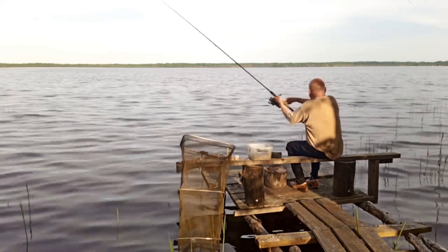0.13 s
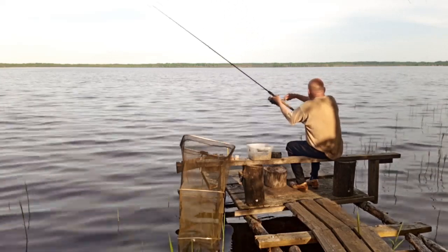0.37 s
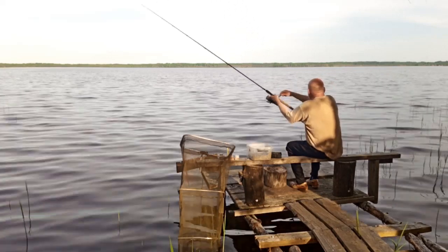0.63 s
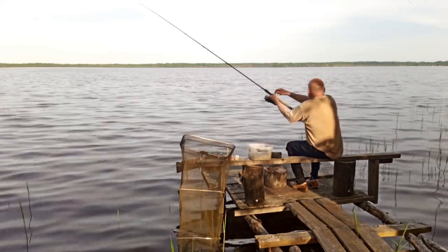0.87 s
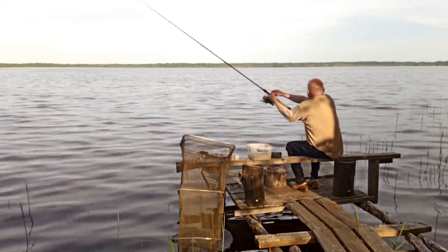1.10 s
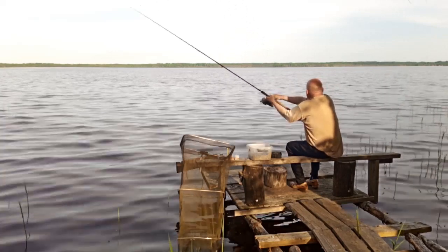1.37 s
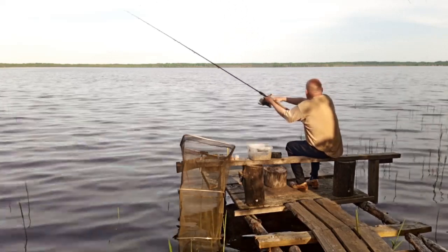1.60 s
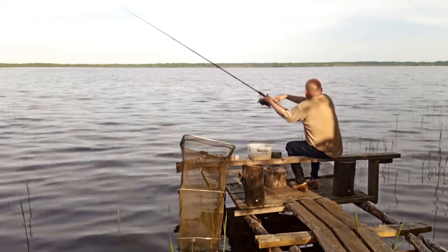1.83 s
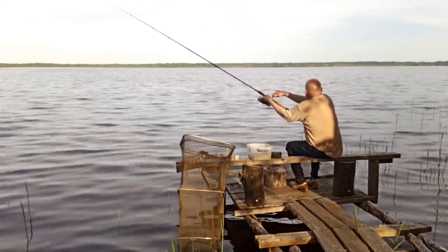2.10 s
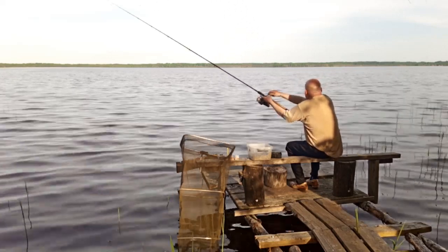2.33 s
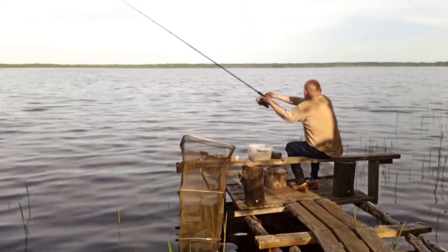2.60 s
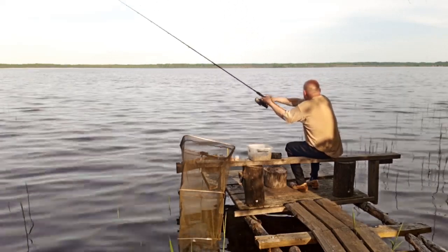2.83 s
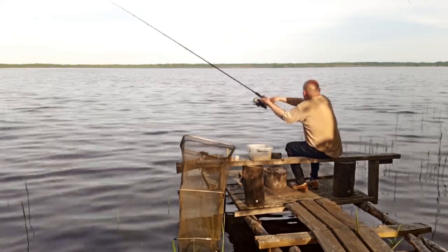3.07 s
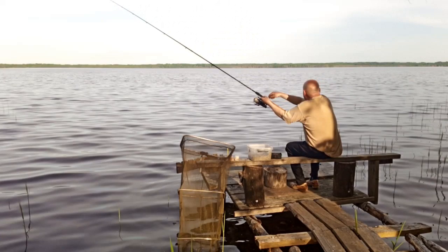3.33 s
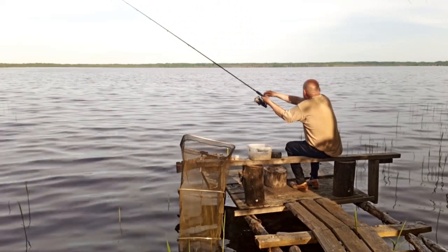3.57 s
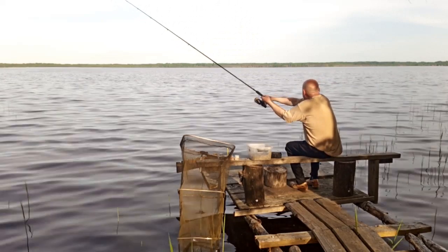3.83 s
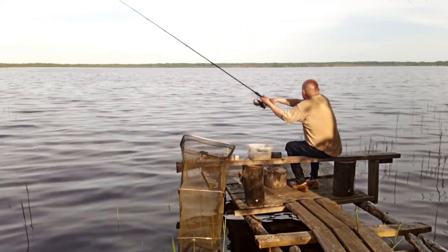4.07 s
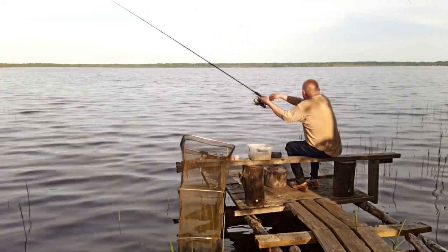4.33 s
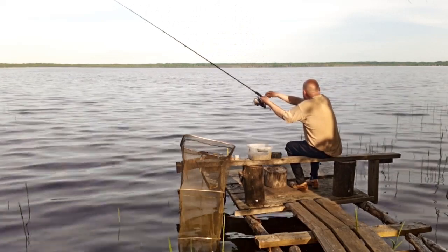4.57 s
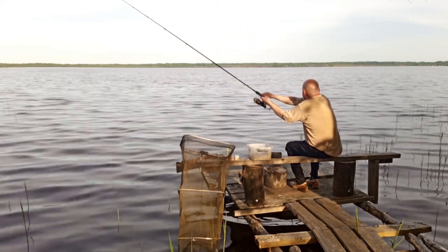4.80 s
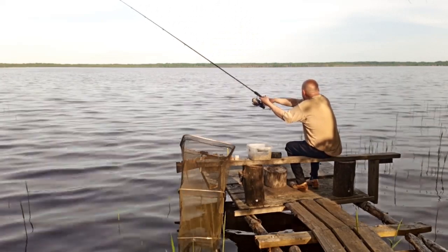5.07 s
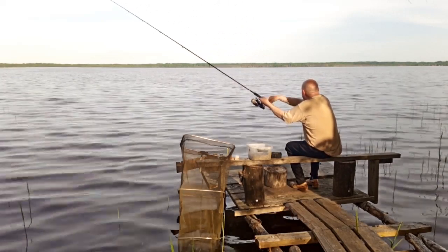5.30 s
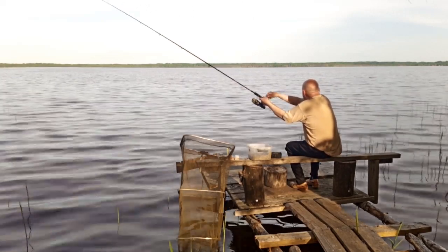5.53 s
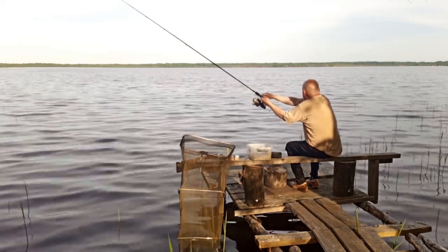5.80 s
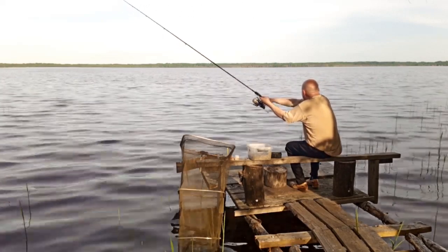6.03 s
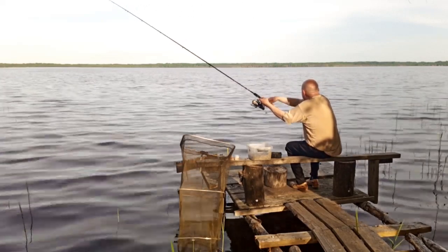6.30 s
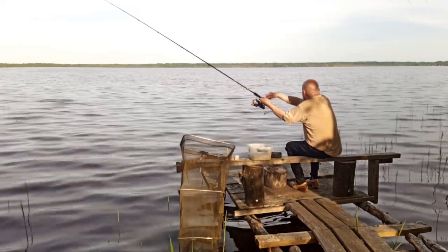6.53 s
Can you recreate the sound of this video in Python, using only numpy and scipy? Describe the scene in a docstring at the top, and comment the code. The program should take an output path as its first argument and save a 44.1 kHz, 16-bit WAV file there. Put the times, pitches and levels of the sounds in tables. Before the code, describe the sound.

Small lake waves slap and gulp against a wooden jetty, busy at first, with bubbling trickles, soft wind rumble and four faint bird notes.

```python
"""A wooden jetty on a lake, close to the water: air pockets gulp and ring as damped, gliding sines.
Small waves slap and smack the wood in bursts of coloured noise, with spray and small bubbles of tiny grains.
A far bird whistles four falling notes. A breeze rumbles at the camera's microphone as swelling low noise,
and the camera's electronics hiss and whine faintly."""
import sys
import numpy as np
from scipy import signal
from scipy.fft import rfft, irfft, next_fast_len
from scipy.io import wavfile
from scipy.ndimage import uniform_filter1d, map_coordinates

SR = 44100
rng = np.random.default_rng(int(sys.argv[2]) if len(sys.argv) > 2 else 0)


def output_pcm(signal):
    """Save a mono or channel-first signal as 16-bit PCM at the path in sys.argv[1].

    Samples are clipped to [-1, 1] before scaling.
    """
    pcm = np.clip(np.atleast_2d(signal).T, -1, 1) * 32767
    wavfile.write(sys.argv[1], SR, np.round(pcm).astype(np.int16))


def ratio_of_db(decibels):
    """Turn decibels (scalar or array-like) into linear amplitude factors; 0 dB maps to 1."""
    return 10 ** (np.asarray(decibels, float) / 20)


N = 293706

# The spectra give shapes only; each layer's loudness is set where it is used.
# far water and electronics: freq_hz, density_db (per Hz)
HISS_SPECTRUM = [(120, -11), (200, 5.5), (316, -1), (379, -4.5), (979, -6.5), (1260, -6.5), (2000, -9),
                 (2770, -7.5), (4710, -21.5), (5060, -36), (5350, -12.5), (6540, -19.5), (9080, -22),
                 (13600, -22.5), (15700, -11)]
# thin electronic tones: pitch_hz, level_db (sine amplitude, before it wavers)
WHINE_TONES = [(3531, -78), (4936, -64), (5606, -80), (5668, -69.5), (6337, -66), (7008, -80), (7068, -71),
               (9872, -84)]
# wind rumble at the microphone: freq_hz, density_db (per Hz)
RUMBLE_SPECTRUM = [(53, -38), (90, 3.5), (129, 8), (269, -7.5), (320, -4), (420, -28), (700, -120)]
# deep wind buffeting at the microphone: freq_hz, density_db (per Hz)
BUFFET_SPECTRUM = [(12, -45), (20, -27), (32, -20), (64, -7), (90, -4), (120, -48), (200, -120)]
# puffs of wind on the microphone: peak_s, rumble_db, buffet_db (added to the calm air), fall_s (to 1/e)
WIND_PUFFS = [(0, -44, -80, 0.018), (.22, -65, -63, 0.066), (.89, -53, -58, 0.024),
              (1.59, -51.5, -74, 0.063), (2.28, -48, -61, 0.032), (3.13, -53.5, -56, 0.041),
              (3.96, -54, -46.5, 0.058), (5.79, -46.5, -67, 0.014)]
# bright falling droplets: freq_hz, density_db (per Hz)
SPRAY_SPECTRUM = [(2200, -1), (3400, -8), (4300, -4), (5400, -0.5), (6500, -0.5), (7600, -16), (9500, -35)]
# restlessness of the water: time_s, unrest_db
UNREST = [(0, 16), (.15, -4.5), (.22, 10.5), (.46, -1.5), (1.09, -1), (1.35, -3.5), (1.59, 2.5), (1.74, -8),
          (1.98, 2.5), (2.35, 0), (2.56, -2), (2.93, 5), (3.11, 2), (4.01, 5.5), (4.32, 0.5), (4.49, -2.5),
          (5.14, -5), (5.57, -2.5), (6.66, -5)]
# the loudest bubbles and gulps, before shaking and filtering:
# peak_s, level_db (peak), pitch_hz (at the peak), t60_s (at least 0.004), glide_per_s (share of the pitch)
AIR_POCKETS = [(0.0125, -5, 563, 0.0052, 10.5), (0.0202, -16, 2310, 0.005, -3.5),
               (.047, -33, 2670, .02, -3), (.0495, -14, 663, 0.049, 1.5), (0.0607, -29, 2280, .006, 8),
               (0.0994, -35, 1690, 0.02, 5.5), (.112, -34, 1513, 0.018, -2), (.133, -37, 1450, 0.025, 1),
               (0.1902, -28.5, 1000, 0.032, -5), (.2003, -25, 820, 0.055, -5.5), (.202, -27, 1640, .01, 10),
               (.216, -39, 2110, .04, -3), (0.246, -30, 2776, 0.0055, -9), (.2487, -28.5, 543, 0.048, 11),
               (0.252, -32, 1420, 0.034, -1), (.266, -33, 1410, 0.023, -2), (.268, -33.5, 601, 0.018, 0),
               (0.2913, -30, 1360, 0.026, -8), (0.308, -31.5, 1400, 0.018, 2),
               (0.326, -32, 1480, 0.015, -9), (.347, -27, 397, 0.35, 10), (.361, -39, 1630, .015, 0),
               (.374, -30, 580, 0.065, 6.5), (.392, -31.5, 604, 0.11, 5.5), (0.391, -32, 1400, 0.029, -1.5),
               (0.482, -34, 2000, 0.032, 20.5), (.64, -44.5, 750, 0.17, -2), (.877, -43, 2330, 0.15, -3.5),
               (1.001, -34, 1443, 0.048, 3), (1.024, -35.5, 1230, 0.02, -2),
               (1.0776, -37.5, 780, 0.025, -0.5), (1.095, -45, 5060, 0.045, 4),
               (1.18, -42.5, 1714, 0.078, 3.5), (1.4206, -36, 696, 0.023, -0.5),
               (1.544, -41, 1550, 0.05, -0.5), (1.57, -27, 624, 0.056, -4), (1.6059, -22, 583, 0.037, 12.5),
               (1.624, -29, 600, 0.016, 3), (1.639, -35.5, 1704, 0.036, -8), (1.667, -42, 519, 0.16, -0.5),
               (1.686, -39, 2190, .03, 1), (1.689, -39.5, 2960, 0.024, 0), (1.775, -46.5, 810, 0.074, 2),
               (2.0068, -31.5, 613, 0.013, -9.5), (2.078, -25.5, 2110, 0.0062, 15.5),
               (2.083, -31, 1630, 0.01, 3), (2.098, -37, 1810, 0.012, -2), (2.0943, -37, 863, 0.018, -1.5),
               (2.266, -34, 499, 0.074, 8), (2.281, -38, 1696, 0.042, -1), (2.37, -44.5, 2860, 0.17, 2.5),
               (2.52, -32.5, 680, 0.016, 4.5), (2.526, -25.5, 1680, 0.022, 4.5),
               (2.5296, -19.5, 2364, 0.0096, 2), (2.5306, -34.5, 658, 0.094, 4.5),
               (2.545, -35, 2350, 0.059, 35), (2.555, -37.5, 2220, .14, 0.5), (2.709, -44, 1120, 0.066, 0),
               (2.7704, -25.5, 369.5, 0.074, 17), (2.77, -30, 1130, 0.042, -6.5),
               (2.857, -38.5, 502.5, 0.28, -1), (2.8729, -26, 523.3, 0.019, -5),
               (2.936, -38.5, 1023, 0.066, 8.5), (2.945, -36, 2040, 0.027, -3.5),
               (3.095, -30, 1830, 0.019, 1.5), (3.1015, -24, 4370, 0.0059, -1.5),
               (3.099, -25.5, 1400, 0.016, 20.5), (3.1022, -24, 2347, 0.011, -9.5),
               (3.1335, -36.5, 520, 0.1, 13), (3.2454, -40, 2024, 0.049, 6),
               (3.3016, -35, 1180, 0.059, -0.4), (3.3738, -32, 1340, 0.016, 12),
               (3.382, -37.5, 567, 0.08, -6), (3.552, -37.5, 1440, 0.051, -0.5),
               (3.6756, -30, 560, 0.029, -5), (3.7861, -37.5, 750, 0.03, 1.5),
               (3.8378, -33, 1850, 0.018, 0), (3.859, -32.5, 1100, 0.022, -4),
               (3.859, -35, 2080, 0.018, 0.5), (3.8707, -25.5, 880, 0.029, -7.5),
               (3.873, -38, 1496, 0.052, -2.5), (3.9204, -34, 790, .021, 1.5),
               (3.944, -31.5, 1975, .028, -3), (3.945, -27, 1300, 0.0056, 1),
               (3.9605, -28, 1310, 0.015, -3), (3.997, -30.5, 653, 0.067, 5),
               (4.0317, -30.5, 1270, .025, 0), (4.0296, -24.5, 2643, 0.03, -6),
               (4.087, -38, 1995, 0.044, 4), (4.089, -36.5, 1340, 0.026, 4.5),
               (4.118, -39.5, 1300, .06, -1.5), (4.094, -36.5, 419, 0.085, -4),
               (4.153, -26, 2486, 0.02, -3), (4.305, -30.5, 447, 0.0041, -6),
               (4.3217, -33, 370.6, 0.0071, -1), (4.386, -30, 3522, 0.028, 1),
               (4.465, -36.5, 1300, 0.026, 5.5), (4.4864, -39, 1282, 0.045, 9),
               (4.4895, -27.5, 617, 0.045, 7), (4.502, -41, 2190, 0.076, 2),
               (4.578, -34, 1920, 0.011, -0.5), (4.586, -35.5, 1583, 0.055, 8.5),
               (4.8052, -36.5, 977, 0.057, 8.5), (4.803, -41.5, 2350, 0.03, -0.5),
               (4.8977, -20, 997, 0.017, 19), (4.979, -26, 1250, 0.022, -11.5),
               (5.481, -40, 2600, 0.0092, 1), (5.703, -35, 525, 0.01, 2), (5.748, -34.5, 745, 0.028, 2),
               (5.76, -42.5, 3970, 0.07, -1), (5.763, -30, 1080, 0.033, -4.5),
               (5.8436, -20.5, 887, 0.017, 5.5), (5.848, -32.5, 1500, 0.022, -0.5),
               (5.864, -30, 1460, 0.033, 6.5), (6.1333, -37, 1408, 0.013, -2.5),
               (6.238, -38, 1350, .03, -2.5), (6.263, -40, 1270, 0.068, 3), (6.267, -35, 1896, 0.032, 0.5),
               (6.2682, -32.5, 840, 0.0085, 0), (6.2737, -25, 4610, 0.0035, 4.5),
               (6.285, -39, 714, 0.032, 0.5), (6.338, -43, 3220, 0.018, 3), (6.413, -45, 2136, 0.063, 1.5),
               (6.545, -46, 2220, 0.027, -2)]
# waves breaking on the posts: slap_s, wash_db (before an 8.5 dB cut), centre_hz,
# spray_db (over the wash), t60_s (at least 0.02)
WAVE_SLAPS = [(0.0208, -36.5, 2350, -3, 0.2), (0.0991, -33.5, 1412, -11.5, 0.35),
              (0.2445, -33, 1414, -31, 0.52), (0.261, -33.5, 2860, -26, 0.22), (.335, -36, 2197, -34, 0.24),
              (0.325, -28, 1300, -44, 0.31), (0.4688, -30.5, 2097, -30, 0.13),
              (0.859, -38, 2120, -30, 0.23), (1.0895, -45, 1160, 0.5, 0.29), (1.14, -40, 1513, -3.5, 0.35),
              (1.542, -45, 1810, -12, .15), (1.658, -38.5, 2130, -35, 0.27),
              (2.0011, -31.5, 1857, -17, 0.21), (2.118, -37, 2714, -21, 0.61),
              (2.0762, -32, 1798, -2, 0.26), (2.223, -37.5, 1370, -10, 0.84),
              (2.518, -30.5, 1816, -29, 0.16), (2.532, -28.5, 2760, -15, 0.15),
              (2.6394, -39, 1425, -38, 0.54), (2.906, -42, 2060, -3, 0.11), (3.064, -28.5, 1385, -19, 0.14),
              (3.085, -25.5, 1883, -17, 0.13), (3.0993, -30.5, 1686, -3.5, 0.27),
              (3.2816, -32.5, 1080, -22, 0.29), (3.3745, -30.5, 1304, -20, 0.23),
              (3.535, -35.5, 1506, -9.5, 0.25), (3.795, -24, 1600, -30, 0.062),
              (3.814, -35.5, 3290, -28, 0.25), (3.8325, -33, 1655, -22, 0.37),
              (3.853, -30.5, 1148, -16, 0.27), (3.919, -29.5, 1643, -21, 0.27),
              (4.0294, -32.5, 2450, -38, 0.16), (4.0853, -48, 1310, -7, 0.097),
              (4.293, -34.5, 1753, -10, 0.25), (4.464, -34, 1044, -17, 0.27),
              (4.576, -33, 1710, -17, 0.078), (4.894, -23, 1234, -16, 0.06),
              (5.429, -46.5, 2550, -20, 0.35), (5.565, -43, 2570, -31, 0.14), (5.695, -36, 1478, -26, 0.17),
              (5.7575, -28.5, 980, -2.5, 0.05), (6.131, -34, 1257, -25, 0.1), (6.237, -34, 1190, -14, 0.11),
              (6.2546, -32, 2110, 5, 0.1), (6.542, -37, 2115, -6, 0.083)]
# sharp smacks of a crest on wood: start_s, level_db (peak)
CREST_SMACKS = [(0.2463, -30), (.2655, -31), (2.5309, -18.5), (3.1017, -25), (3.8697, -28), (3.9445, -38),
                (4.0293, -27)]
# a far bird: start_s, level_db (before a 6 dB lift), first_hz, last_hz, length_s
BIRD_NOTES = [(.995, -59, 3300, 2950, .06), (1.185, -57, 3200, 2800, .055), (1.39, -60, 3120, 2780, .11),
              (1.6, -59, 3400, 2850, .09)]


def unit(x):
    """Scaled to rms 1."""
    return x / np.sqrt(np.mean(x ** 2) + 1e-20)


def curves(rows):
    """One value per sample for each column after the time."""
    s, *cols = np.transpose(rows)
    return [np.interp(np.arange(N) / SR, s, c) for c in cols]


def wobble(rate):
    """A smooth random curve, rate knots a second."""
    knots = rng.standard_normal(int(N * rate / SR) + 4)
    return map_coordinates(knots, [np.arange(N) * rate / SR])


def coloured(x, spectrum):
    """x shaped by (Hz, dB) points on a log axis, all but silent outside them, at rms 1."""
    m = next_fast_len(N + 8192)
    hz, db = np.transpose(spectrum)
    bins_hz = np.fft.rfftfreq(m, 1 / SR)
    gain = ratio_of_db(np.interp(np.log(bins_hz + 1), np.log(hz + 1), db, -120, -120))
    return unit(irfft(rfft(x, m) * gain, m)[:N])


def rush(spectrum, patchy_db):
    """Coloured noise with narrow, lingering patches of random gain."""
    z = signal.stft(rng.standard_normal(N + 512), nperseg=512)[2]
    field = uniform_filter1d(rng.standard_normal(z.shape), size=2, axis=0)  # across pitch
    field = uniform_filter1d(field, size=9, axis=1)  # along time
    noise = signal.istft(z * ratio_of_db(patchy_db * unit(field)), nperseg=512)[1][:N]
    return coloured(noise, spectrum)


def grains(rate, centre_hz, spread, cycles, scatter_db, length, size=N, climb=0):
    """Random bubbles, rate a second: soft-started sines that fall 26 dB in some cycles, length seconds long."""
    count = int(rate * size / SR)
    draw = rng.random((count, 2))
    place, chance = draw[:, :1], draw[:, 1:]
    hz = centre_hz * np.exp(spread * rng.standard_normal((count, 1))) * (1 + climb * place)
    life = np.arange(int(length * SR)) / SR * hz / cycles
    strength = ratio_of_db(np.minimum(-scatter_db * np.log(1 - chance), 18))
    envelope = strength * np.exp(-3 * life) * (1 - np.exp(-4.5 * life))
    wave = envelope * np.sin(2 * np.pi * cycles * life)
    at = (place * size).astype(int) + np.arange(life.shape[1])
    return unit(np.bincount(at.ravel(), wave.ravel(), size)[:size])


def camera():
    """Nearly steady coloured hiss with thin sine tones whose strength and phase waver."""
    t = np.arange(N) / SR
    tones = np.zeros(N)
    for hz, db in WHINE_TONES:
        strength = ratio_of_db(db + 4 * wobble(16))
        tones += strength * np.sin(2 * np.pi * hz * t + wobble(12) / 2)
    hiss_gain = ratio_of_db(-55.5 + 0.4 * wobble(5.1))
    return hiss_gain * rush(HISS_SPECTRUM, patchy_db=1.8) + tones


def breeze():
    """A light air buffets the microphone in lumps of low noise; puffs swell out of it as bell-shaped gains."""
    calm_rumble_db, calm_buffet_db, puff_rise_s = -58.5, -65.5, 0.047
    s, rumble_db, buffet_db, fall_s = np.transpose(WIND_PUFFS)[:, :, None]
    late = np.arange(N) / SR - s
    puff = np.exp(-(late / np.where(late < 0, puff_rise_s, fall_s)) ** 2)
    rumble_gain = ratio_of_db(calm_rumble_db) + (ratio_of_db(rumble_db) * puff).sum(axis=0)
    buffet_gain = ratio_of_db(calm_buffet_db) + (ratio_of_db(buffet_db) * puff).sum(axis=0)
    rumble = rumble_gain * rush(RUMBLE_SPECTRUM, patchy_db=4)
    buffet = buffet_gain * rush(BUFFET_SPECTRUM, patchy_db=0.5)
    lumps = ratio_of_db(1.5 * wobble(9))
    return lumps * (rumble + buffet)


def spray():
    """Falling droplets: dense tiny grains and sparser ringing drops on a bright hiss."""
    tiny = grains(2800, 5104, 0.43, cycles=12, scatter_db=4, length=0.0065)
    tiny = coloured(tiny, SPRAY_SPECTRUM)
    drops = grains(300, 4600, 0.2, cycles=150, scatter_db=2.5, length=0.04)
    hiss = rush(SPRAY_SPECTRUM, patchy_db=3.5)
    return unit(0.35 * tiny + 0.6 * drops + 0.6 * hiss)


def lapping(fizz):
    """Big pockets slosh, small ones burble and spray fizzes, all the more as the water is restless."""
    unrest_db, = curves(UNREST)
    slosh = grains(250, 622, 0.351, cycles=20.2, scatter_db=3, length=0.048)
    small = grains(650, 1850, 0.33, cycles=45, scatter_db=2.5, length=0.055)
    # each layer: level at unrest 0, then dB per dB of unrest
    pockets = ratio_of_db(-55 + 0.83 * unrest_db) * slosh + ratio_of_db(-54.5 + 1.26 * unrest_db) * small
    surge = ratio_of_db(1.24 * wobble(16))
    return surge * pockets + ratio_of_db(-58 + 0.15 * unrest_db) * fizz


def bubbles():
    """Each air pocket swells to its peak, then rings away as a sine while its pitch glides."""
    out = np.zeros(N + SR)
    lead = SR // 20  # samples ahead of each peak
    t = np.arange(-lead, SR // 5) / SR
    for s, db, hz, t60, glide in AIR_POCKETS:
        # the swell takes some cycles plus a share of the ring time, in seconds
        rise = 0.88 / hz + min(0.064 * t60, 0.0063)
        fade_db = -60 * np.abs(t / max(t60, 0.004)) ** 1.186
        swell_db = np.where(t < 0, -9 * (t / rise) ** 2, fade_db)
        swell_db -= 150 * np.maximum(glide * t - 0.55, 0)  # it bursts on reaching the surface
        pitch_hz = hz * (1 + np.clip(glide * t, -0.5, 0.8))
        phase = 2 * np.pi * np.cumsum(pitch_hz) / SR + rng.uniform(0, 2 * np.pi)
        out[round(s * SR):][:len(t)] += ratio_of_db(db + swell_db) * np.sin(phase)
    shaken = ratio_of_db(1.1 * wobble(130)) * out[lead:][:N]  # the churning water shakes every pocket
    # small pockets radiate no deep bass
    return signal.sosfilt(signal.butter(2, 140, "high", fs=SR, output="sos"), shaken)


def planks(x):
    """The jetty and the water surface return a short dull tail of fading noise, 150 samples late."""
    t = np.arange(SR // 8) / SR
    tail = uniform_filter1d(rng.standard_normal(len(t)), size=5) * ratio_of_db(-60 * t / 0.13)
    return signal.fftconvolve(np.pad(x, (150, 0)), tail / np.linalg.norm(tail))[:N]


def slaps(fizz):
    """Each wave bursts into a rough wash of noise and bubbles around its own pitch, sprays and drains away."""
    rise_s, spray_lag_s = 0.0034, 0.0049  # droplets fall just after the slap
    wash, spray_gain = np.zeros(N + SR), np.zeros(N + SR)
    t = np.arange(SR // 2) / SR
    hz_axis = np.fft.rfftfreq(len(t), 1 / SR) + 1
    for s, db, hz, spray_db, t60 in WAVE_SLAPS:
        drain_db = -60 * (t / max(t60, 0.02)) ** 1.315
        burst = ratio_of_db(db - 8.5 + drain_db) * (1 - np.exp(-t / rise_s)) ** 2
        # trapped air rings at chance pitches
        pockets_db = 4.5 * unit(uniform_filter1d(rng.standard_normal(len(hz_axis)), size=60))
        colour = ratio_of_db(pockets_db - 10.7 * np.log2(hz_axis / hz) ** 2)
        froth = unit(irfft(rfft(rng.standard_normal(len(t))) * colour, len(t)))
        # later bubbles are smaller, so higher
        swarm = grains(900, hz, 0.25, cycles=45, scatter_db=1.5, length=0.029, size=len(t), climb=0.73)
        start = round(max(s - 0.006, 0) * SR)  # the water piles up just before the slap
        wash[start:][:len(t)] += burst * unit(froth + ratio_of_db(1.5) * swarm)
        spray_start = start + round(spray_lag_s * SR)
        spray_gain[spray_start:][:len(t)] += burst * ratio_of_db(spray_db)
    lumps = ratio_of_db(2 * wobble(110) + 1.2 * wobble(350))  # the froth arrives in clumps
    return lumps * wash[:N] + ratio_of_db(1.2 * wobble(90)) * spray_gain[:N] * fizz


def smacks():
    """A crest hits wood: a single push of pressure, heard through the middle band."""
    s, db = np.transpose(CREST_SMACKS)
    band = signal.butter(5, [880, 3300], "band", fs=SR, output="sos")
    top = np.abs(signal.sosfilt(band, signal.unit_impulse(512))).max()
    pushes = np.bincount((s * SR).astype(int), -ratio_of_db(db) / top, N)
    return signal.sosfilt(band, pushes)


def bird():
    """Thin sine notes that slide down, soft at both ends."""
    s, db, first_hz, last_hz, length = np.transpose(BIRD_NOTES)[:, :, None]
    t = np.clip(np.arange(N) / SR - s, 0, length)
    cycles = first_hz * t - (first_hz - last_hz) / length * t ** 2 / 2
    phase = 2 * np.pi * cycles + 1.4 * wobble(110)  # blurred by the distance
    strength = ratio_of_db(db + 6 + 1.6 * wobble(60))
    envelope = np.sqrt(np.abs(np.sin(np.pi * t / length))) * (t < length)
    return (strength * envelope * np.sin(phase)).sum(axis=0)


def scene():
    """Water near the jetty, a far bird, wind and the camera's own noise, on one channel."""
    fizz = spray()
    near = bubbles() + smacks()
    echo = ratio_of_db(-15.5) * planks(near)
    water = near + echo + slaps(fizz) + lapping(fizz)
    return (water + bird() + breeze() + camera())[None]


def low_pass(x):
    """Removes everything above the highest recorded frequency."""
    return signal.sosfilt(signal.butter(12, 16560, fs=SR, output="sos"), x)


def record(dry):
    """Takes the finished mix to its final sound."""
    return low_pass(dry)


dry = scene()
out = record(dry)
output_pcm(out)
```